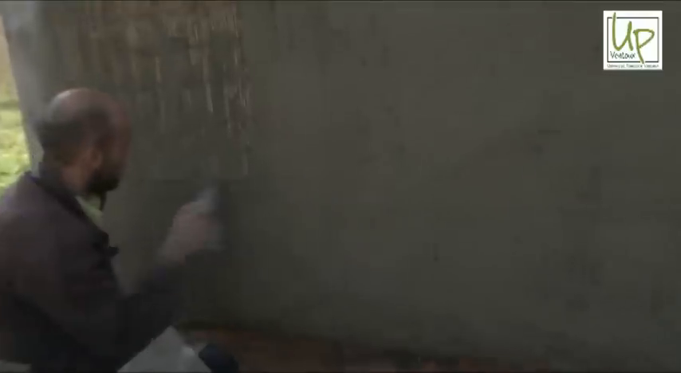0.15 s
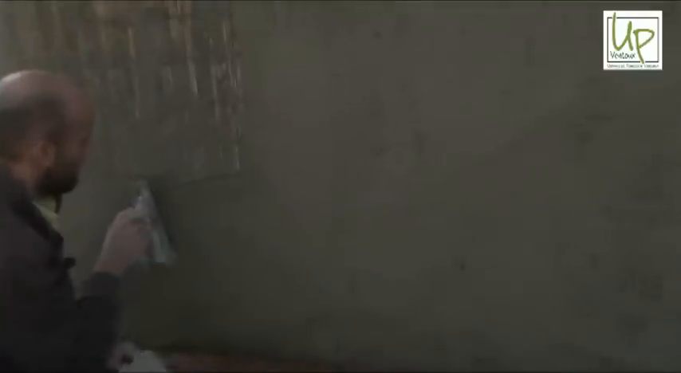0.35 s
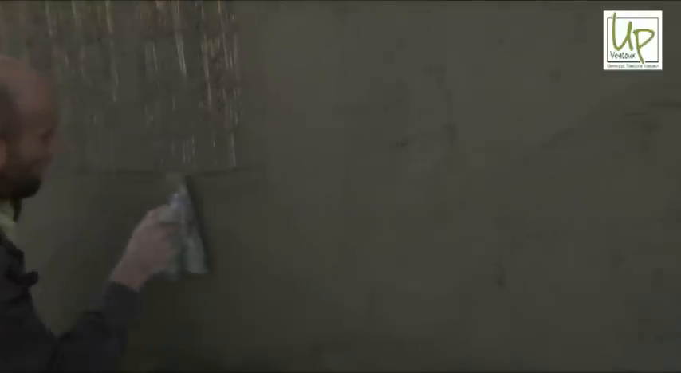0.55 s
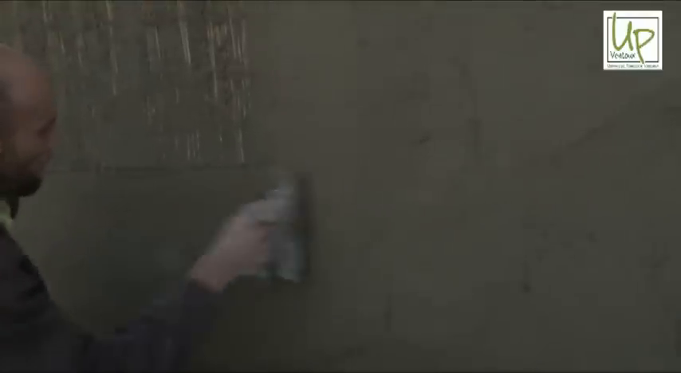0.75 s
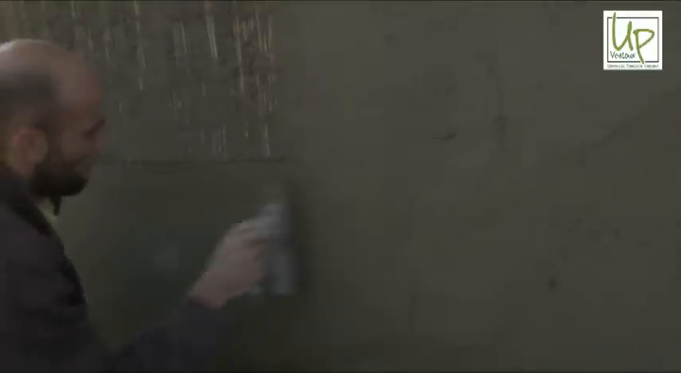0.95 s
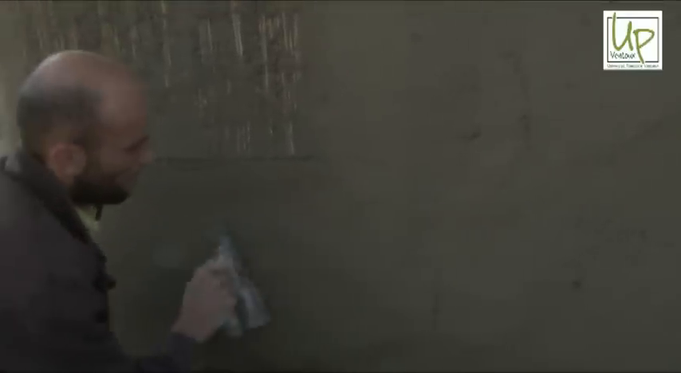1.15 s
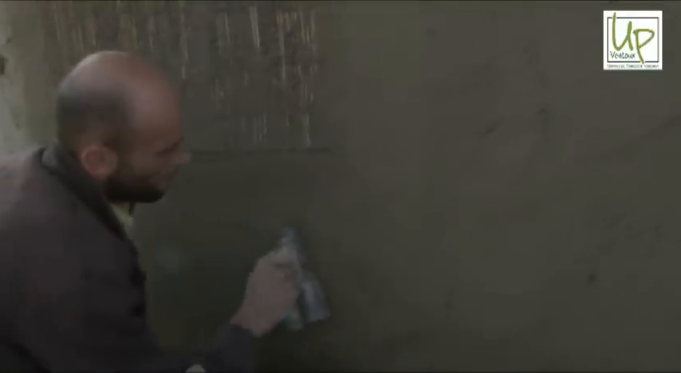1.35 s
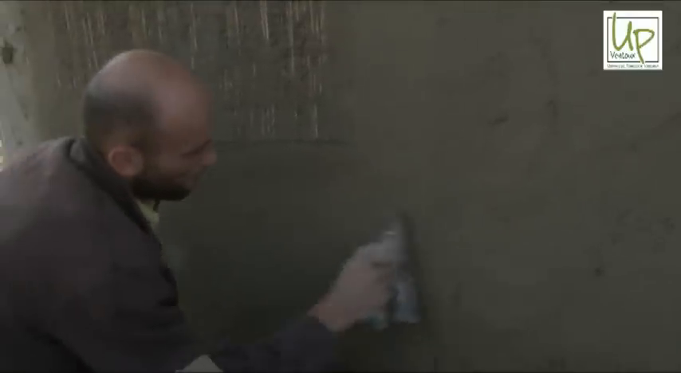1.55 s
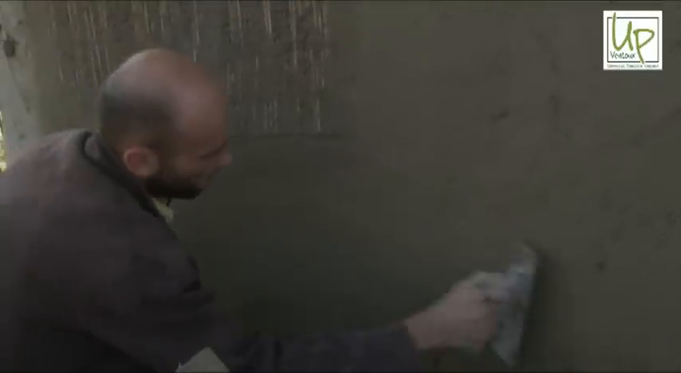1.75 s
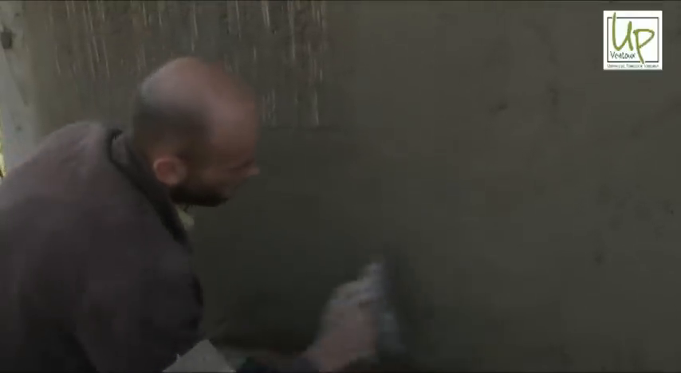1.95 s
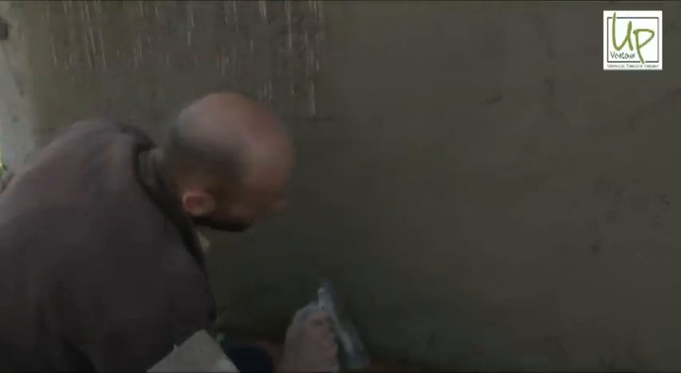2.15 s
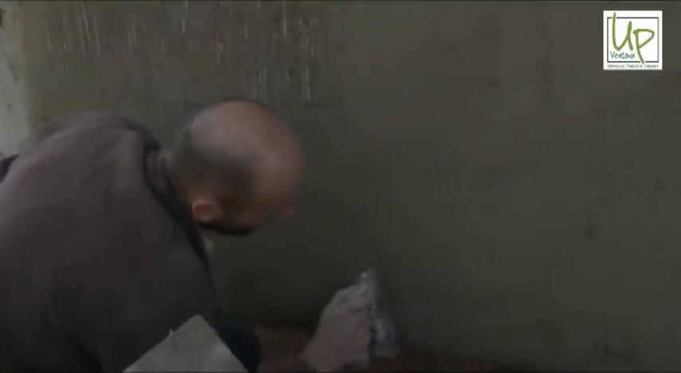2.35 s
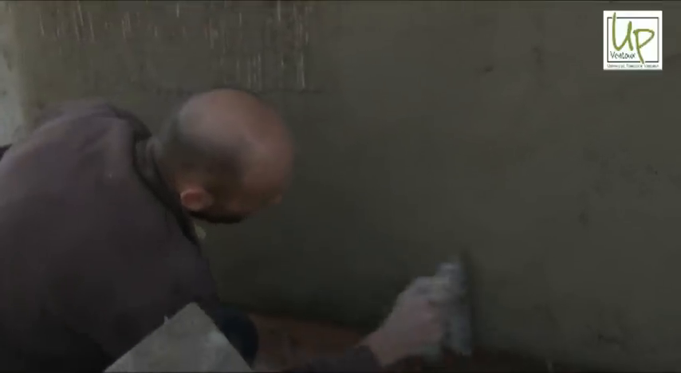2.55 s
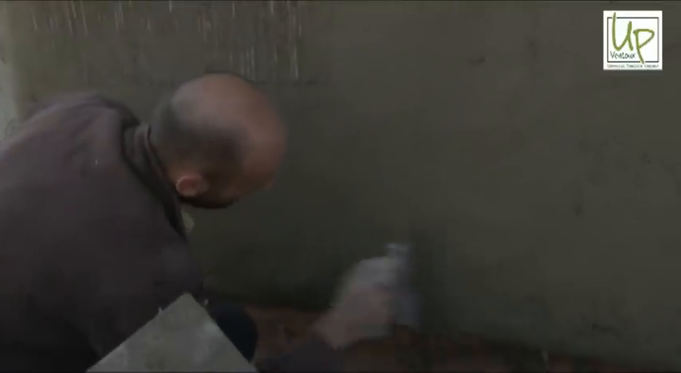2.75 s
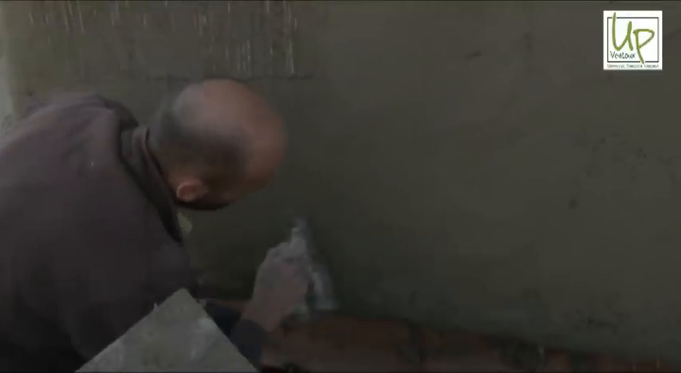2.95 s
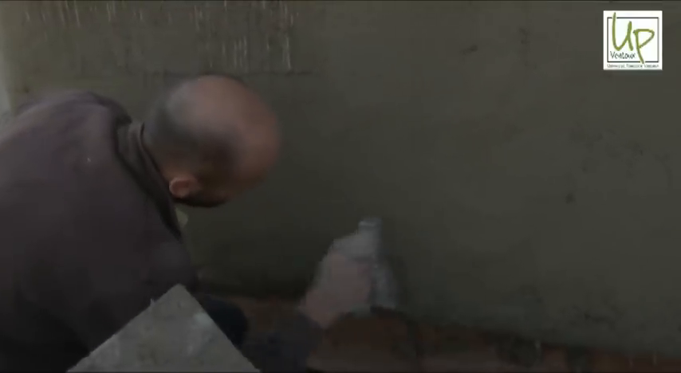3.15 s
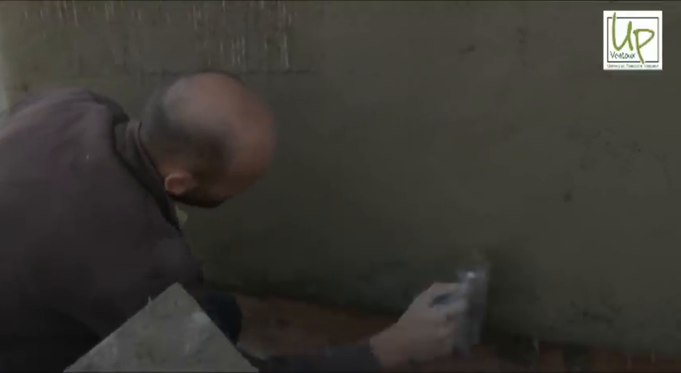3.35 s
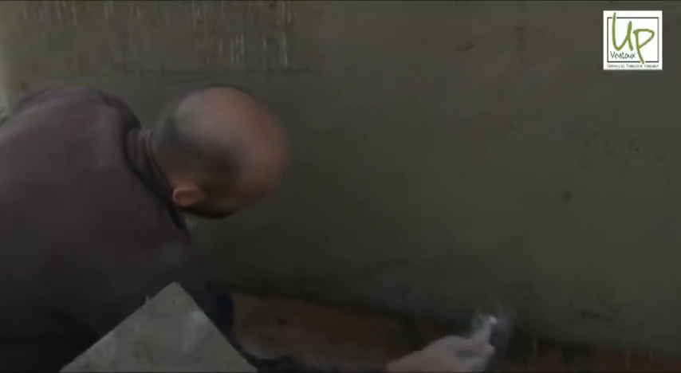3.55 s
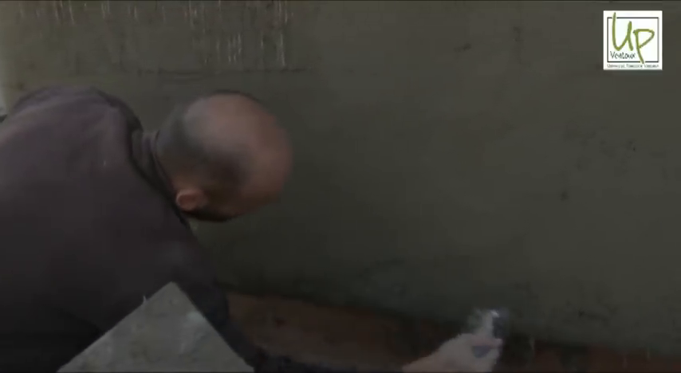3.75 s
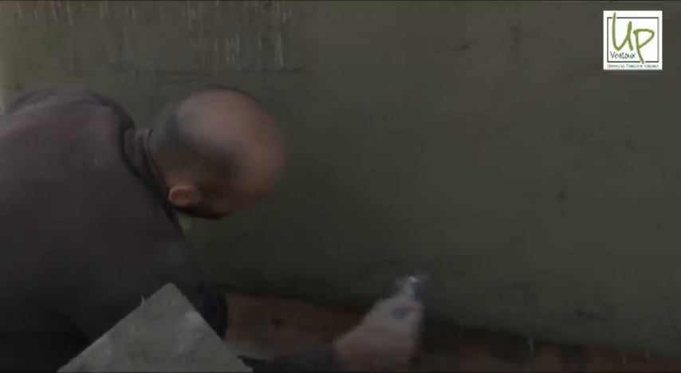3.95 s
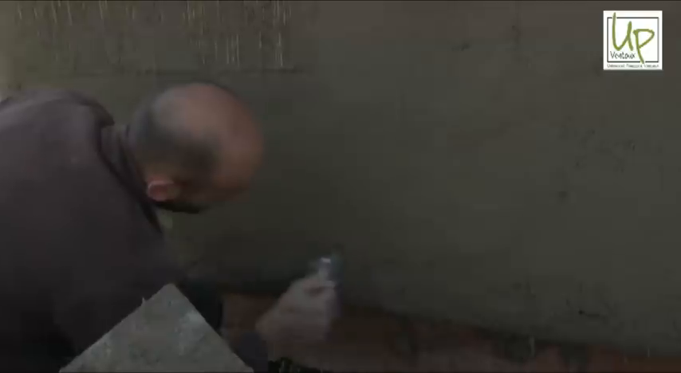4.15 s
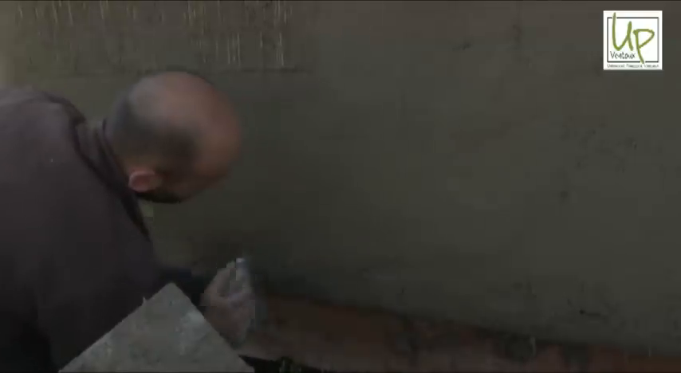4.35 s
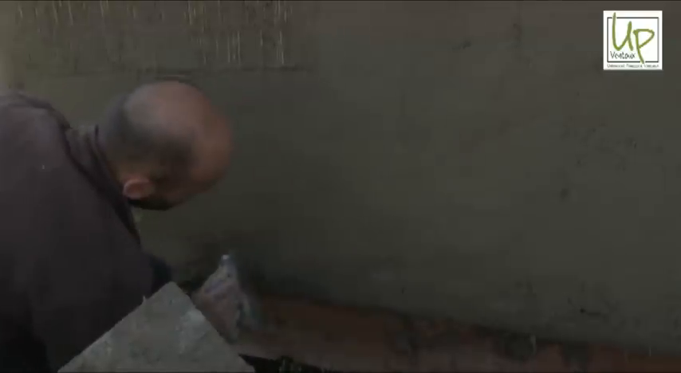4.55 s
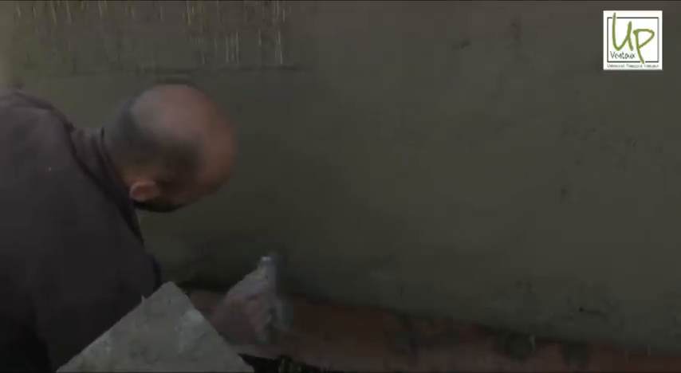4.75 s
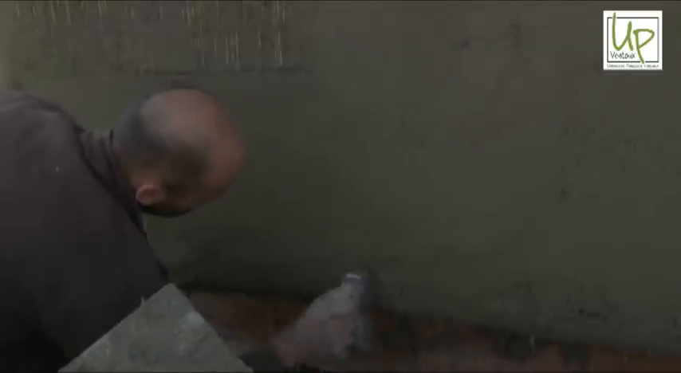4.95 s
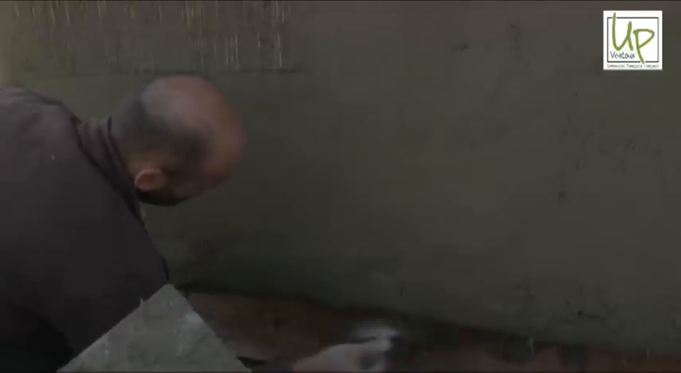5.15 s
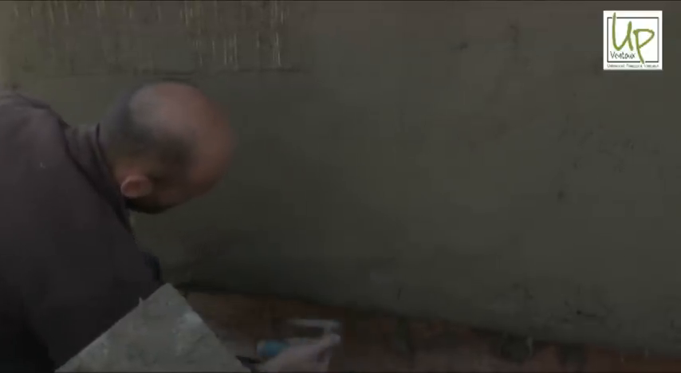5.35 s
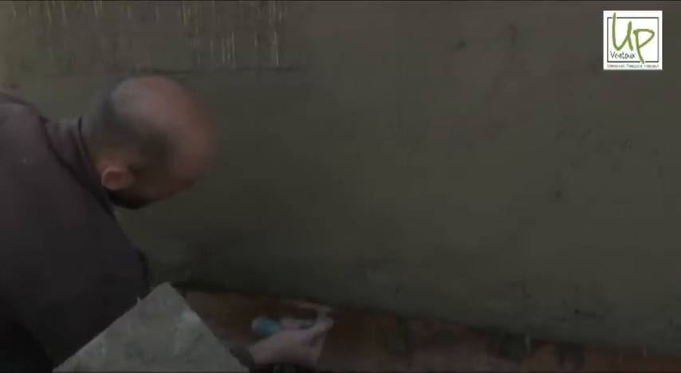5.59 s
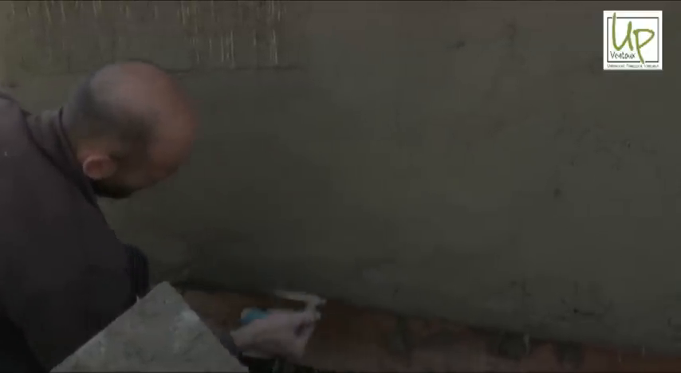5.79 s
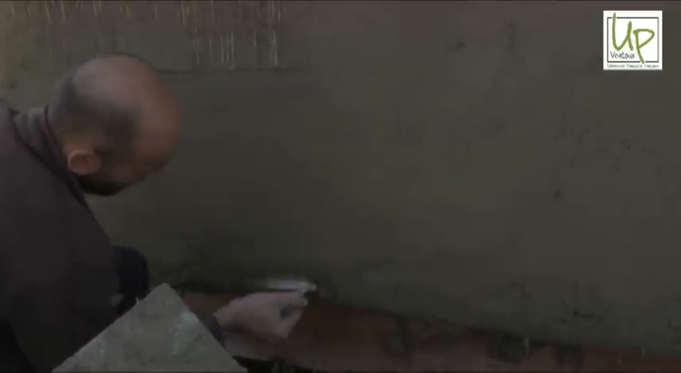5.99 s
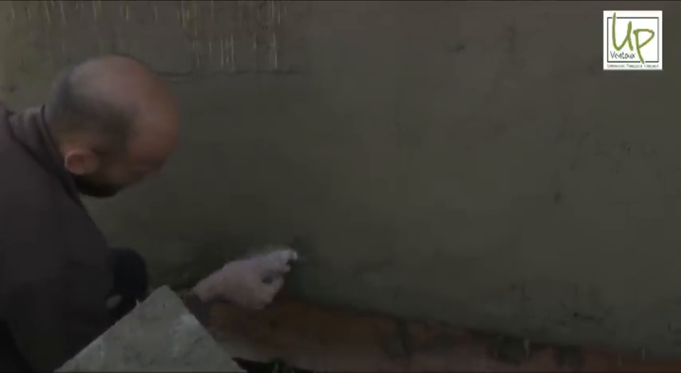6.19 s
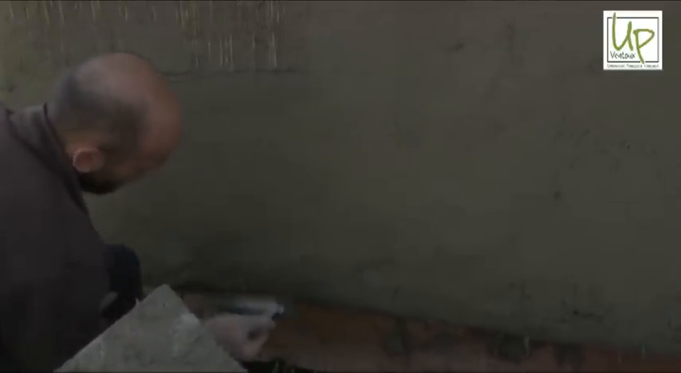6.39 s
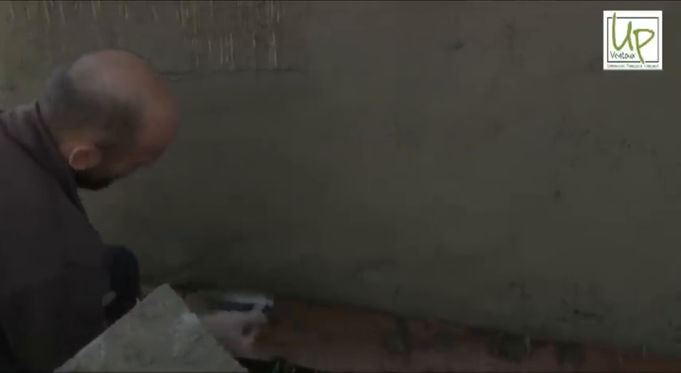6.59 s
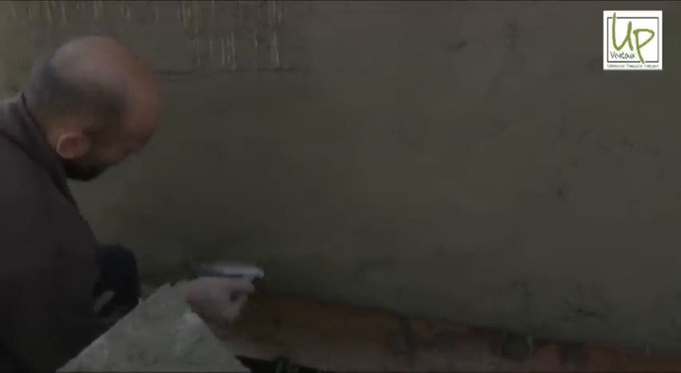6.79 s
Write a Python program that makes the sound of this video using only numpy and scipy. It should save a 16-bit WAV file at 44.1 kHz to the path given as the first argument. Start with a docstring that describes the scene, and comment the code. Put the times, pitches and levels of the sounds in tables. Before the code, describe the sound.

A small steel trowel scrapes fresh earth plaster in nine gritty, ringing strokes outdoors, over soft wind rumble and a faint low motor hum.

```python
"""An outdoor wall: a small steel trowel smooths fresh earth plaster in repeated strokes.
Sand clicks hiss under the blade and excite its ring, which sinks and grows with pressure over dragging mud.
Coarse grit catches as crunchy ringing bursts, and once the edge squeaks in fast, nearly regular slips.
A ground echo and short tail follow the trowel. Filtered clicks make sleeve rustles and one light blade graze;
wind rumbles as filtered noise; far off are a gliding bird, narrow-band buzzes, motor tones and a bed of air."""
import sys
import numpy as np
from scipy import signal
from scipy.fft import rfft, irfft
from scipy.io import wavfile

SR = 44100
rng = np.random.default_rng(int(sys.argv[2]) if len(sys.argv) > 2 else 0)


def persist_wave(psi):
    """Save psi, clipped to +-1, as 16-bit WAV."""
    counts = np.round(np.clip(psi, -1, 1) * 32767).astype(np.int16)
    wavfile.write(sys.argv[1], SR, np.atleast_2d(counts).T)


N = 301203
T = np.arange(N) / SR  # the timeline, s


def from_db(db):
    """Decibels to gain."""
    return 10 ** (np.asarray(db) / 20)


def unit(x):
    """Scales to rms 1."""
    return x / np.sqrt(np.mean(x ** 2) + 1e-20)


def follow(rows):
    """The columns of a curve table, interpolated at every sample."""
    t, *columns = np.transpose(rows)
    return [np.interp(T, t, column) for column in columns]


def add(mix, t, sound):
    """Mixes a sound in at time t (s)."""
    part = mix[max(round(t * SR), 0):][:len(sound)]
    part += sound[:len(part)]


def colour(x, spectrum):
    """Filters x through a spectrum drawn over log frequency; rms 1."""
    hz, db = np.transpose(spectrum)
    f = np.fft.rfftfreq(N, 1 / SR)
    gain = from_db(np.interp(np.log(f + 1), np.log(hz), db))
    return unit(irfft(rfft(x) * gain, N))


def noise(spectrum):
    """Coloured noise of rms 1."""
    return colour(rng.standard_normal(N), spectrum)


def wander(rate_hz):
    """Smooth random drift: noise under a Gaussian low-pass, down to 1/e at rate_hz; rms 1."""
    f = np.fft.rfftfreq(N, 1 / SR)
    return unit(irfft(rfft(rng.standard_normal(N)) * np.exp(-(f / rate_hz) ** 2), N))


def hump(t, half_s, order=2):
    """A smooth rise and fall of height 1 around time t, down to 1/e at half_s either side."""
    distance_from_top = np.minimum(abs((T - t) / half_s), 6)
    return np.exp(-distance_from_top ** order)


def resonate(x, hz, width_hz):
    """A steep resonance that can follow a moving pitch."""
    # shift the pitch down to zero, low-pass twice there, then shift it back up
    turn = np.exp(2j * np.pi * np.cumsum(hz * np.ones(len(x))) / SR)
    r = np.exp(-np.pi * width_hz / SR)
    smooth = signal.lfilter([(1 - r) ** 2], [1, -2 * r, r * r], x / turn)
    return 2 * (turn * smooth).real


def grains(per_s, spread_db):
    """Clicks at random moments with random sign and size, as grains break loose; rms 1."""
    # a positive spread gives a few large clicks, a negative one a few small clicks
    size = from_db(spread_db * np.minimum(rng.exponential(1, N), 4))
    sign = rng.choice([-1, 1], N)
    return unit(size * sign * (rng.random(N) < per_s / SR))


# pressing lays more steel on the wall: the ring sinks and grows, and more mud is dragged
LIGHT_HZ, PRESSED_HZ = 3220, 2015  # blade pitch at pressure 0 and 1
RING_LIGHT_DB, RING_PRESSED_DB = -16, 3.5  # before each stroke's own ring level
DRAG_LIGHT_DB, DRAG_PRESSED_DB = -32, -14.5  # before the digs
# tone of the dragged mud: f/Hz, relative level/dB
MUD_TONE = [(80, -35.5), (200, 2.5), (370, -6), (500, 2), (690, 3), (830, -1), (980, 3), (1400, -1),
            (2200, -12), (5000, -36.5)]


def trowel():
    """Grains under the sliding blade hiss, ring the steel and drag the mud."""
    level_db, pressure, tilt, steel_db, heel_db, mud_db = stroke_controls()
    blade_hz = LIGHT_HZ * (PRESSED_HZ / LIGHT_HZ) ** pressure
    ring_db = steel_db + RING_LIGHT_DB + (RING_PRESSED_DB - RING_LIGHT_DB) * pressure
    drag_db = DRAG_LIGHT_DB + (DRAG_PRESSED_DB - DRAG_LIGHT_DB) * pressure + mud_db
    # the blade sticks and slips, so the grains' level flickers
    judder = unit(from_db(1.17 * wander(rate_hz=120) + 1.02 * wander(rate_hz=570)))
    sand = hiss(judder, tilt)
    steel = from_db(ring_db) * ring(judder, blade_hz, heel_db)
    mud = from_db(drag_db) * colour(grains(per_s=4000, spread_db=-1.5), MUD_TONE)
    return from_db(level_db) * (sand + steel + mud)


# strokes: landing t/s, lift t/s, place of top speed/0-1 (held within 0.05-0.95), level there/dB,
# swell before it/dB, sag after it/dB (negative rises), first and last pressure/0-1,
# first and last tilt/0 flat - 1 on edge, ring level/dB, heel contact level/dB (levels and pressure before digs)
STROKES = [(0, 0.169, 1, -30, 7.2, 0.5, .9, 0.31, .55, .6, -0.5, 3),
           (0.662, 1.039, 0.61, -34.5, 14.2, -3, 0.87, 0.93, .95, 0.37, -2, 1),
           (1.413, 1.962, 0.7, -29.5, 5.8, 2.8, 0.32, 0.73, 0.67, .38, 2, -1.5),
           (2.456, 2.834, 0.35, -32.5, 9, 1.5, 0.31, 0.63, .75, 0.48, -1, 0),
           (3.222, 3.495, 0.78, -28, 13.2, 8, .05, 0.86, 1, 0.38, -1, -2),
           (4.03, 4.508, 0.3, -35, 6, 7.5, 0.83, 0.52, 0.37, 0.14, 2, -14),
           (4.825, 5.239, 0.26, -35.5, 24, 0, 0.013, 0.26, 1, 0.5, 3, -11),
           (5.705, 6.19, 0.75, -37.5, 17, 7, .2, 0, 0.3, 0.067, -1.5, -23),
           (6.185, 6.464, 0.3, -36, 7, 11, 0.1, 0.067, .3, 0.43, -3, 4)]
# the blade digs into a ridge of plaster or eases over a hollow:
# t/s, half length/s, added pressure/0-1, added level/dB, added mud level/dB
DIGS = [(0.014, 0.029, 0.088, 0, 4.5), (0.18, 0.042, 0.5, -1.5, 6), (0.715, 0.044, -0.17, -2, 4),
        (0.772, .035, 0.26, 1.5, 0.5), (1.003, 0.1, 0.11, 2, 6.5), (1.428, 0.016, 0.37, 0.5, 4),
        (1.48, 0.027, -0.18, -3.5, 8), (1.781, 0.036, 0.24, 0.5, -5), (1.888, 0.029, 0.014, 3.7, -1),
        (1.957, 0.033, 0.22, 2.5, 4), (2.756, 0.029, 0.33, 1.5, 0.5), (2.831, 0.021, 0.43, 1.5, -0.5),
        (3.448, 0.013, 0.26, 1, -9), (3.493, 0.013, .2, 3, 4.5), (4.12, 0.022, -.15, 2.5, 5.5),
        (4.226, 0.047, 0.17, 0.5, -3), (4.366, 0.037, -0.67, 1.5, 4), (5.209, 0.014, 0.56, 4.5, 0),
        (5.244, 0.02, 0.61, 3, 4), (6.383, 0.032, -0.34, -1, 4), (6.44, 0.038, 0.47, 5.5, -4)]
DIG_EDGE = 2.2  # steepness of a dig's flanks
LAND_DB_PER_S, LIFT_DB_PER_S = 1901, 461  # how fast contact is made and lost
PRESS_BEND = 1.24  # pressure changes slowly at first, faster towards the lift


def stroke_controls():
    """Strokes land, swell, sag and lift as pressure and tilt shift; ridges and hollows bend them briefly."""
    level_db = np.full(N, -150.)
    controls = np.zeros((4, N))  # pressure, tilt, ring level, heel level
    for (lands, lifts, top, db, swell_db, sag_db,
         press_from, press_to, tilt_from, tilt_to, ring_db, heel_db) in STROKES:
        u = np.clip((T - lands) / (lifts - lands), 0, 1)  # progress through the stroke
        top = np.clip(top, .05, .95)
        before_db = swell_db * (1 - u / top) ** 2
        after_db = sag_db * ((u - top) / (1 - top)) ** 2
        slow_db = np.where(u < top, before_db, after_db)
        off_db = LAND_DB_PER_S * np.maximum(lands - T, 0) + LIFT_DB_PER_S * np.maximum(T - lifts, 0)
        stroke_db = db - slow_db - off_db
        on = stroke_db > level_db  # the louder stroke takes over
        u, level_db[on] = u[on], stroke_db[on]
        controls[0, on] = press_from + (press_to - press_from) * u ** PRESS_BEND
        controls[1, on] = tilt_from + (tilt_to - tilt_from) * u
        controls[2, on], controls[3, on] = ring_db, heel_db
    pressure, tilt, steel_db, heel_db = controls
    mud_db = np.zeros(N)
    for t, half_s, press, db, wet_db in DIGS:
        dig = hump(t, half_s, order=DIG_EDGE)
        pressure = pressure + press * dig
        level_db = level_db + db * dig
        mud_db = mud_db + wet_db * dig
    return level_db, pressure, np.clip(tilt, 0, 1), steel_db, heel_db, mud_db


# tone of the sand before the blade's tilt shades it: f/Hz, relative level/dB
SAND_TONE = [(300, -53.5), (1200, -14), (2300, -2.5), (3100, 2.5), (3900, -2.5), (4400, -1.5), (5200, 0.5),
             (6000, -1), (6900, 1.5), (8000, -2.5), (9500, -5.5), (12000, -6.5)]


def hiss(judder, tilt):
    """Fine sand under the blade: a flat blade muffles it, the bare edge sharpens it."""
    sand = colour(judder * grains(per_s=14000, spread_db=2.5), SAND_TONE)
    flat = colour(sand, [(3000, 1), (4300, 4.0), (6000, -3.0), (11000, -2.5)])
    edge = colour(sand, [(1700, -3), (2900, 0.5), (3900, -5.5), (5200, 1.0), (11000, 1.0)])
    return (1 - tilt) * flat + tilt * edge


# resonances of the blade: f/multiple of blade pitch, width/Hz, relative level/dB
BLADE_MODES = [(.975, 600, 4.5), (1.25, 900, -9.5), (2.05, 897, -16)]
# resonances from heel contact: f/multiple of blade pitch, width/Hz, level/dB before heel contact
HEEL_MODES = [(.74, 720, 0.75), (1.31, 850, -1)]
# tone that shades the ringing steel: f/Hz, relative level/dB
STEEL_TONE = [(500, -9), (1150, -10), (1600, 0), (1950, 1.5), (2400, -0.5), (2800, 5), (3300, -7),
              (4000, 4), (8000, -22.5)]


def ring(judder, blade_hz, heel_db):
    """Coarse grains excite the steel, whose resonances the wet plaster damps heavily."""
    def excite(modes):
        coarse = judder * grains(per_s=8000, spread_db=2.0)
        return sum(from_db(db) * resonate(coarse, k * blade_hz, width) for k, width, db in modes)
    blade = excite(BLADE_MODES)
    heel = from_db(heel_db) * excite(HEEL_MODES)
    return colour(blade + heel, STEEL_TONE)


# the blade lands or catches on coarse grit: t/s, level/dB before a 2 dB trim, ring f/Hz, 60 dB decay/s
CATCHES = [(.026, -23, 2150, 0.045), (0.085, -20, 2680, 0.029), (0.669, -50, 2600, .09),
           (.909, -22, 3600, 0.031), (1.278, -56.5, 7900, 0.045), (1.391, -38, 2190, 0.16),
           (1.7436, -40, 4900, 0.12), (2.4543, -27.5, 2200, 0.037), (2.5574, -27, 4850, 0.057),
           (2.581, -20, 5460, 0.026), (3.216, -40, 2260, 0.14), (3.296, -31, 2680, 0.044),
           (3.793, -47.5, 8100, 0.026), (4.028, -22, 2530, 0.048), (4.0607, -22.5, 2430, .037),
           (4.1732, -18.5, 2900, 0.025), (4.1824, -20, 3770, 0.029), (4.2512, -19.5, 2340, .06),
           (4.3293, -26, 3060, .08), (4.4963, -33.5, 2100, 0.046), (4.814, -45.5, 10100, .045),
           (4.821, -44.5, 3370, 0.091), (5.135, -29.5, 2960, 0.073), (5.723, -39.5, 3820, 0.093)]
CATCH_WIDTH, CRUNCH_DB = 0.54, -5.5  # ring width as a share of its pitch; crunch relative to the ring


def catches():
    """Each catch is a short noise crunch that rings the blade."""
    out, t = np.zeros(N), np.arange(SR // 8) / SR
    for start, db, hz, t60 in CATCHES:
        crunch = rng.standard_normal(len(t))
        ringing = unit(resonate(crunch, hz, width_hz=CATCH_WIDTH * hz))
        sound = ringing + from_db(CRUNCH_DB) * crunch
        decay = from_db(db - 2 - 60 * t / t60)
        attack = 1 - np.exp(-t / 0.0005)
        add(out, start - .001, sound * decay * attack)
    return out


# the edge chatters over a pebble with a short squeak: t/s, slip rate f/Hz (before jitter), level/dB
SQUEAK = [(2.556, 420, -40.5), (2.572, 412, -23), (2.582, 418, -19), (2.592, 420, -33.5),
          (2.62, 260, -36.5)]


def squeak():
    """Fast, nearly regular slips ring a high mode of the blade's edge."""
    slip_hz, db = follow(SQUEAK)
    turns = np.cumsum(slip_hz * (1 + .011 * wander(rate_hz=250))) / SR
    # harmonics 6-25 of the slip rate, slightly scattered in phase
    slips = sum(np.cos(2 * np.pi * (k * turns + 0.33 * rng.random())) for k in range(6, 26))
    sliding = (T > SQUEAK[0][0]) & (T < SQUEAK[-1][0])
    return sliding * from_db(db) * unit(resonate(slips, 5800, width_hz=2500))


def yard(x):
    """The ground throws back an early echo whose delay drifts as the hand moves; a short weak tail follows."""
    delay = 0.0022 + 0.000392 * wander(rate_hz=1.51)  # s
    echo = np.interp(T - delay, T, x)
    t = np.arange(SR // 3) / SR
    tail = rng.standard_normal(len(t)) * from_db(-60 * t / .15) * (t > .005)
    tail = tail / np.linalg.norm(tail)
    return x + from_db(-10) * echo + from_db(-14) * signal.fftconvolve(x, tail)[:N]


# soft rustles as the arm swings back, and at 0.625 s a light early graze of the blade:
# t/s, half length/s, level/dB before the flicker
RUSTLES = [(0.297, 0.18, -57), (0.625, 0.054, -52), (1.377, .08, -57), (2.22, 0.16, -57.5),
           (3.56, 0.087, -52), (3.8, 0.1, -56.5), (4.65, 0.48, -58.5), (5.44, 0.097, -62), (6.65, 0.6, -75)]
# tone of the rustles: f/Hz, relative level/dB
RUSTLE_TONE = [(500, -5), (1500, 5), (2800, -1), (5000, -3.5), (7500, -7.5), (12000, -13.5)]
CLOTH_DB = -65  # steady cloth rustle under them, before the flicker


def sleeve_and_graze():
    """Flickering filtered clicks: cloth rustles as the arm swings back, and the blade grazes once lightly."""
    swell = from_db(CLOTH_DB) + sum(from_db(db) * hump(t, half_s) for t, half_s, db in RUSTLES)
    flicker = from_db(-1.5 + 1.05 * wander(rate_hz=46))
    return swell * flicker * colour(grains(per_s=4300, spread_db=-1.0), RUSTLE_TONE)


# tone of the wind: f/Hz, relative level/dB
WIND_TONE = [(10, -8.5), (25, -4), (40, -9.5), (55, 2), (75, 0), (100, -11.5), (130, -15), (200, -30),
             (350, -36.5), (1000, -77)]
BREEZE_DB, BREEZE_DB_PER_S = -42.5, -1.11  # the breeze under the gusts slowly dies down
# gusts: t/s, half length of the hump/s, level/dB
GUSTS = [(1.25, 0.66, -37.5), (2.037, 0.12, -36.5), (3.02, 0.087, -39), (3.626, .3, -44),
         (4.637, 0.49, -40.5), (6.11, 0.23, -42)]
# wind buffets the microphone: t/s, envelope peak level/dB, f/Hz
BUFFETS = [(1.075, -28, 55.9), (1.277, -23, 62.5), (3.70, -25, 60), (3.925, -28.5, 50.7), (4.59, -26.5, 45),
           (4.693, -23, 49), (4.797, -23.5, 45), (4.857, -23.5, 51.7)]


def wind():
    """Low noise rumbles and swells in gusts; single soft buffets are short low tone bursts."""
    breeze_power = from_db(BREEZE_DB + BREEZE_DB_PER_S * T) ** 2
    gust_power = sum((from_db(db) * hump(t, half_s)) ** 2 for t, half_s, db in GUSTS)
    out = np.sqrt(breeze_power + gust_power) * noise(WIND_TONE)
    t = np.arange(-SR // 20, SR // 20) / SR
    for centre, db, hz in BUFFETS:
        swell = from_db(db) * np.exp(-(t / 0.0094) ** 2)
        add(out, centre + t[0], swell * np.cos(2 * np.pi * (hz * t + rng.random())))
    return out


# bird notes: t/s, length/s, start f/Hz, middle f/Hz, end f/Hz, level/dB before a 4 dB trim
BIRD_NOTES = [(6.497, 0.039, 3500, 4050, 3300, -57), (6.532, 0.025, 3600, 3750, 3850, -59),
              (6.556, .022, 3500, 3850, 4150, -57), (6.596, 0.015, 3350, 3530, 3800, -54.5),
              (6.625, .026, 2900, 2980, 3050, -59), (6.803, .035, 3170, 3020, 3130, -53)]


def bird():
    """A far bird twitters in short gliding whistles, each a sine under a half-sine swell."""
    out = np.zeros(N)
    for t, length, *pitch_hz, db in BIRD_NOTES:
        u = np.linspace(0, 2, round(length * SR))  # 0 start, 1 middle, 2 end
        phase = 2 * np.pi * np.cumsum(np.interp(u, np.arange(3), pitch_hz)) / SR
        add(out, t, from_db(db - 4) * np.sin(phase) * np.sin(np.pi * u / 2))
    return out


# thin high buzzes: t/s, half length/s, f/Hz, level/dB before the hump
BUZZES = [(3.82, 0.088, 4770, -73), (5.47, 0.077, 4500, -63), (5.87, .06, 4400, -59)]


def buzzes():
    """Faint buzzes swell and fade: noise through a narrow resonance."""
    rasp = rng.standard_normal(N)
    out = np.zeros(N)
    for t, half_s, hz, db in BUZZES:
        out += from_db(db) * hump(t, half_s) * unit(resonate(rasp, hz, width_hz=540))
    return out


# a distant motor: t/s, fundamental f/Hz (before drift), fundamental level/dB, second harmonic level/dB
HUM = [(0, 74.93, -49, -66), (.95, 74.73, -47, -56), (1.6, 75.72, -56, -59), (6.83, 75.03, -72.5, -59)]
# a fainter engine farther off: t/s, f/Hz, level/dB
DRONE = [(5.3, 187.6, -88), (5.6, 196, -60.5), (5.85, 204, -64.5), (6.15, 191.8, -59.5), (6.83, 205, -63.5)]
# tone of the outdoor air: f/Hz, relative level/dB
AIR_TONE = [(20, -26.5), (200, 2.5), (330, -3.5), (600, -1.5), (1000, 1), (1300, -1.5), (1600, -0.5),
            (2000, -11.5), (3000, -20), (5000, -32), (8000, -32.5), (12000, -36)]


def distance():
    """Far motors hum as drifting sines over the filtered noise of outdoor air."""
    hz, first_db, second_db = follow(HUM)
    phase = 2 * np.pi * np.cumsum(hz + 0.13 * wander(rate_hz=2.7)) / SR
    hum = from_db(first_db) * unit(np.sin(phase)) + from_db(second_db) * unit(np.sin(2 * phase))
    drone_hz, drone_db = follow(DRONE)
    drone = from_db(drone_db) * unit(np.sin(2 * np.pi * np.cumsum(drone_hz) / SR))
    return hum + drone + from_db(-53.0) * noise(AIR_TONE)


def scene():
    """Everything reaches one microphone, which feeds both channels alike."""
    wall = yard(trowel() + catches() + squeak())
    mono = wall + sleeve_and_graze() + wind() + bird() + buzzes() + distance()
    return np.array([mono, mono])


def record(dry):
    """The recorder's band limit: a steep low-pass."""
    low_pass = signal.firwin(701, 12120, window=("kaiser", 8), fs=SR)  # cutoff in Hz
    return signal.oaconvolve(dry, low_pass[None], "same")


dry = scene()
out = record(dry)
persist_wave(out)
```